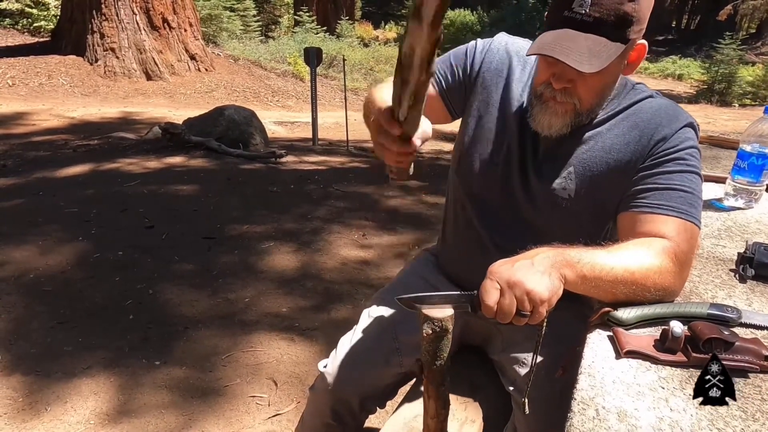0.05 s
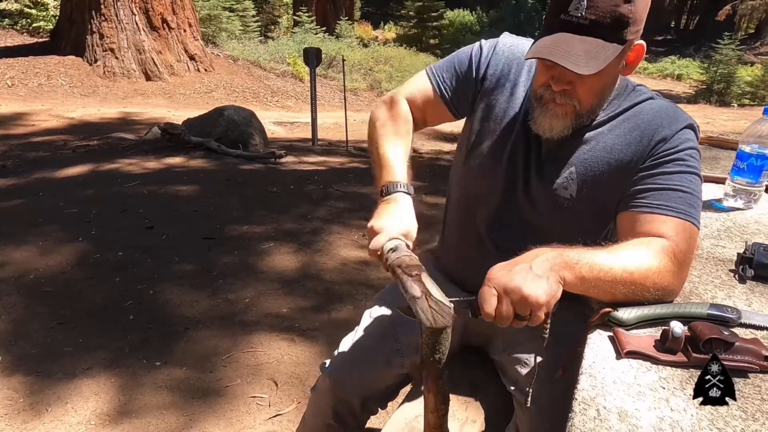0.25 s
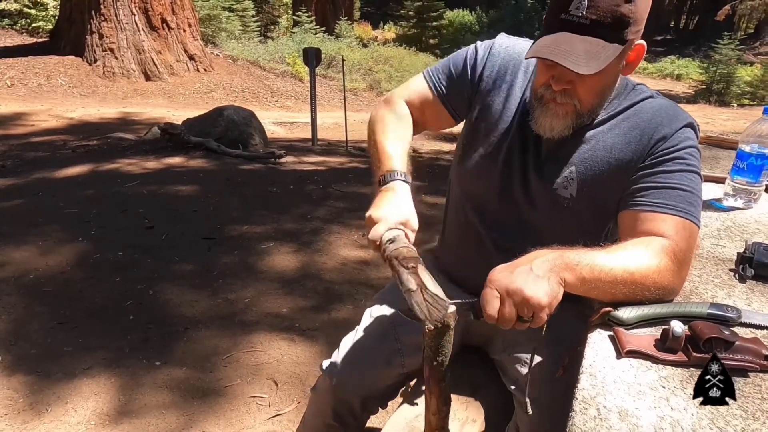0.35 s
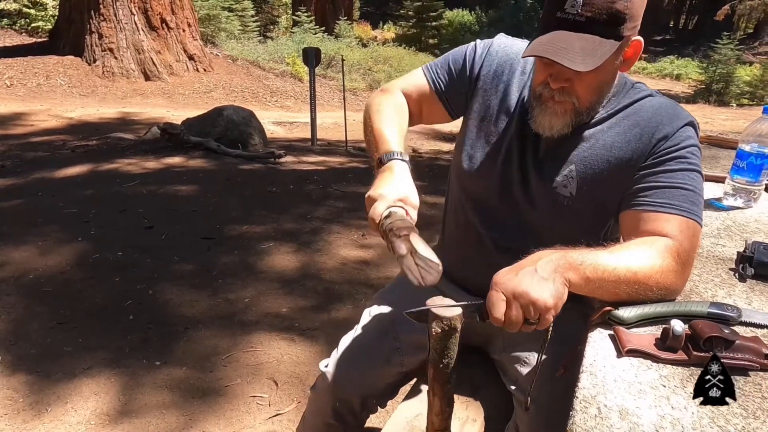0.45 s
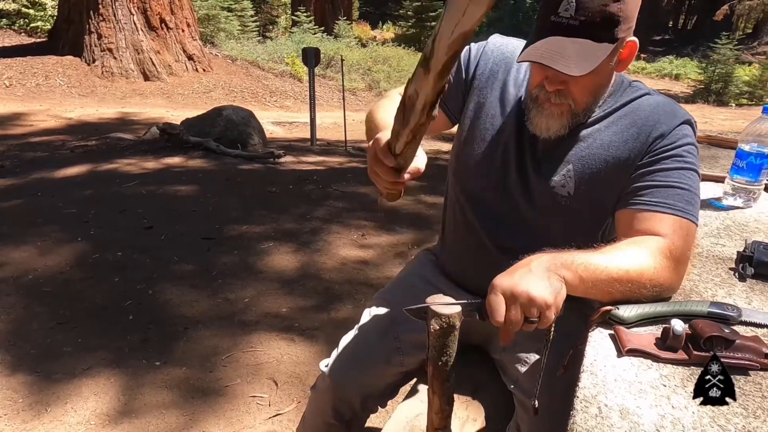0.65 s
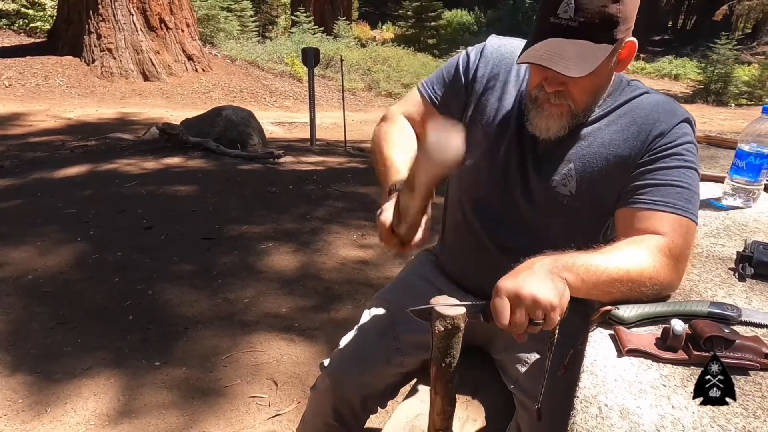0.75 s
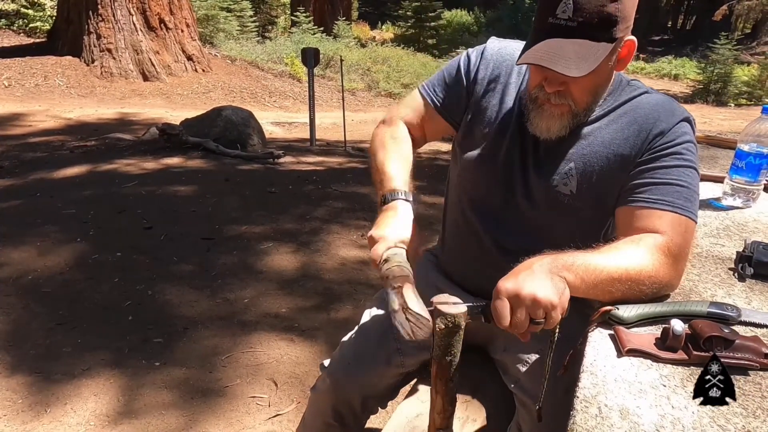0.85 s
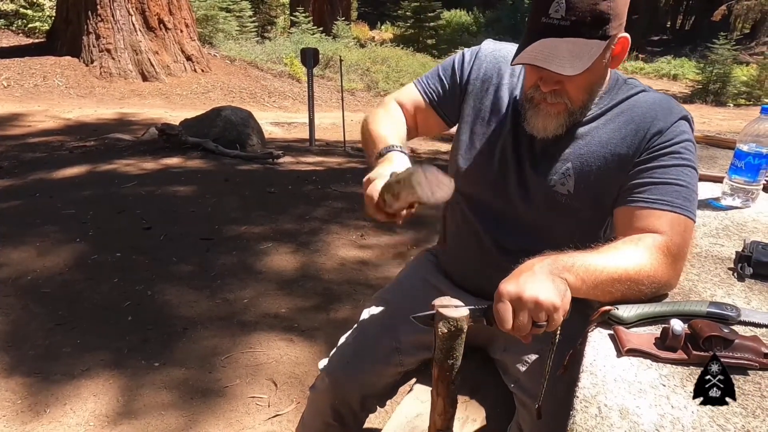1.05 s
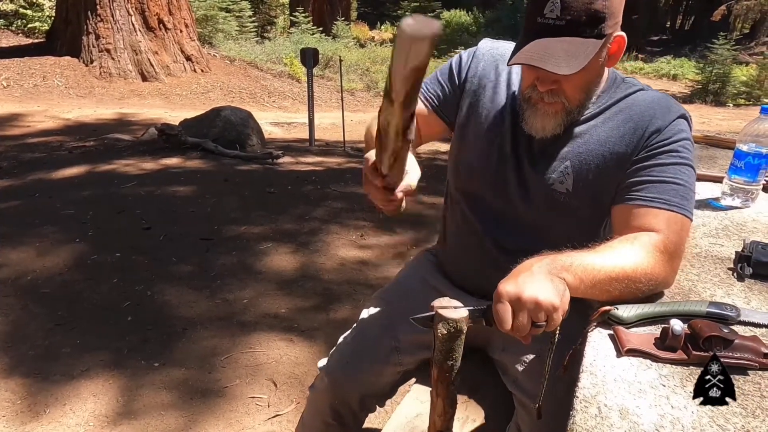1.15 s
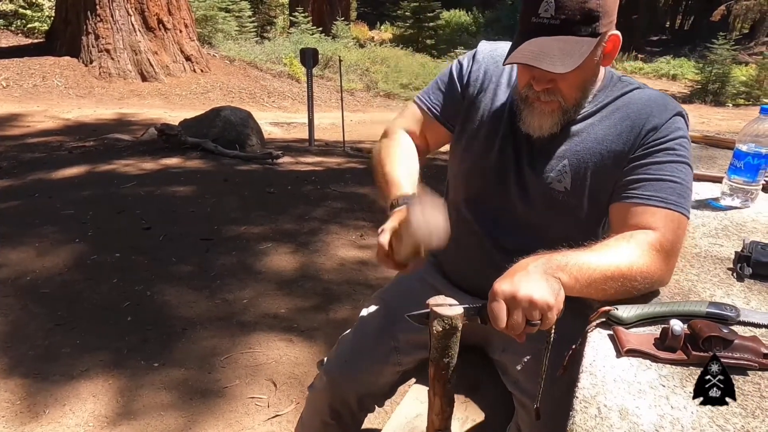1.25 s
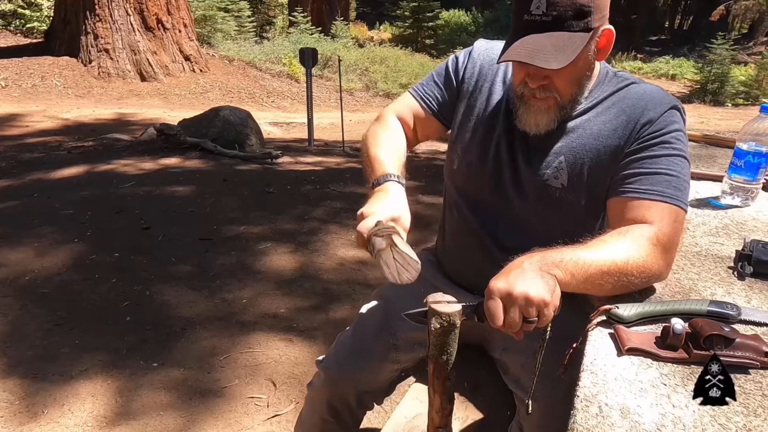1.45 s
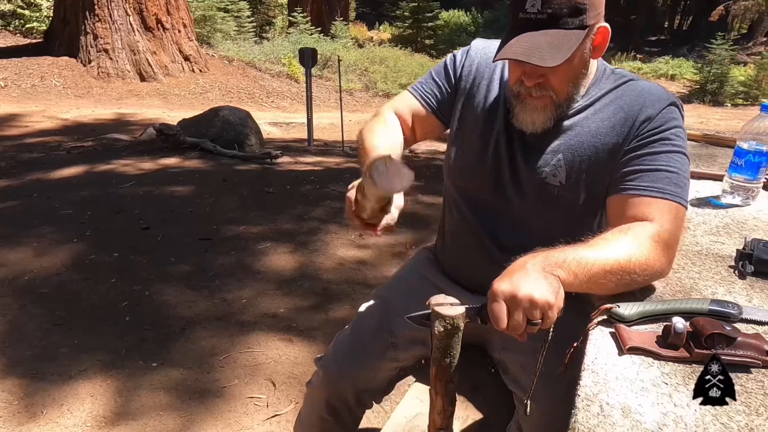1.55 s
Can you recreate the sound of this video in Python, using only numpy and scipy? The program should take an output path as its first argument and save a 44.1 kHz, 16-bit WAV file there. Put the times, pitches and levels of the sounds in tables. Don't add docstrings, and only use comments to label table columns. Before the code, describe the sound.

A wooden baton knocks a knife through a small log, three sharp woody cracks in a forest clearing

```python
import sys
import numpy as np
from scipy import signal
from scipy.fft import rfft, irfft
from scipy.io import wavfile
from scipy.ndimage import uniform_filter1d

SR = 44100
rng = np.random.default_rng(int(sys.argv[2]) if len(sys.argv) > 2 else 0)


def volts(x):
    e = np.asarray(x, float) / 20
    return 10 ** e


def to_wav(s):
    ch = np.atleast_2d(s).T
    pcm = np.round(np.clip(ch, -1, 1) * 32767)
    wavfile.write(sys.argv[1], SR, pcm.astype(np.int16))


N = 70560

# (frequency [Hz], level [dB per Hz])
AIR_SPECTRUM = [(15, -39), (25, -25), (54, -12.5), (90, -16), (180, -6), (383, -8.5), (438, -11.5),
                (543, -8), (879, -19.5), (2000, -20.5), (3260, -30), (5000, -38), (15000, -71)]
# (frequency [Hz], likeness [-1 to 1])
SIDE_LIKENESS = [(60, 0.93), (180, 0.94), (550, 0.82), (1650, 0.36), (4970, 0.74), (15000, 0.96)]
# (frequency [Hz], width [Hz], boost [dB])
DIFFUSE_MODES = [(340, 45, 0.5), (700, 62, 7), (1800, 270, 5), (3230, 120, 6)]
# (time [s], level [dB], half length [s])
SLEEVE_SWELLS = [
    (0.478, -78.5, 0.046),
    (0.988, -77.5, 0.031),
    (1.5, -84, 0.025),
]
# (frequency [Hz], level [dB])
CLOTH_SPECTRUM = [(1500, -20), (4000, 8), (8000, 8.5), (12000, 2), (15000, -22)]
# (frequency [Hz], level [dB], decay t60 [s])
TREE_ECHO = [(98.7, -45, .4), (317.7, -46, 1), (660, -32.5, 0.97), (970, -33.5, 0.98), (2020, -40, 0.92),
             (2600, -41, 0.86), (3300, -44.5, 0.96), (5500, -41, 0.35), (11000, -42, 0.49)]
# (time [s], level [dB], pitch [Hz], decay t60 [s])
SPLINTERS = [(0.3031, -56, 4750, 0.0069), (0.468, -50.5, 4680, 0.022), (0.5995, -61, 4650, 0.0099),
             (0.6931, -55, 4930, 0.0067), (0.728, -60, 8000, 0.0074), (.754, -56, 4490, 0.0088),
             (.9274, -63.5, 8000, 0.0091), (.992, -37, 5470, 0.0051), (1.0344, -65, 5912, .01),
             (1.133, -64, 5000, .008), (1.4157, -58, 6000, .014), (1.464, -64, 7000, 0.018),
             (1.4762, -61.5, 5500, 0.0091), (1.4854, -69, 5030, .01), (1.499, -56.5, 7000, 0.011),
             (1.506, -51, 5860, 0.01), (1.5104, -56, 5500, 0.011), (1.5434, -68, 4860, 0.0098),
             (1.555, -64, 6010, .016), (1.5897, -69, 5070, 0.011)]
# (time [s], crack [dB], log [dB], stump [dB], ground [dB])
CONTACTS_HEARD = [
    (0.2299, 0.5, -7.5, -8.5, -57.5),
    (.262, -44.5, -26, -55.5, -47),
    (0.278, -57.5, -50, -21.5, -45),
    (0.4673, -42, -50, -48, -90.5),
    (0.7938, -2.5, 1.5, -7, -19.5),
    (0.824, -55, -27, -30, -31),
    (0.841, -26, -22, -16, -44.5),
    (1.2832, -4.5, -1.5, -7, -17),
    (1.3218, -26.5, -26.5, -61, -25),
    (1.364, -67, -41.5, -29.5, -60),
]
# (time [s], crack [dB], log [dB], stump [dB], ground [dB])
RETOUCHES = [
    (0.2439, -28, -40.5, -52, -67.5),
    (0.8573, -72.5, -44.5, -22, -61),
    (1.308, -69.5, -33.5, -20, -54),
    (1.38, -70, -64, -38.5, -60),
]
DEEPER_AT = [.5, 1.1]
# (frequency [Hz], level [dB], decay t60 [s], lag [s])
BLADE_MODES = [
    [(1023, -13.5, 0.043, 0.0012), (1455, -1.5, 0.013, 0.000036), (1888, -10.5, 0.036, .001),
     (2438, -3, 0.008, .002), (3104, -1.5, 0.014, .0024), (3292, -4, 0.015, 0.002226),
     (4650, -9, 0.014, .0004), (6350, -11, 0.0066, .0008)],
    [(1023, -12.5, 0.049, 0.0023), (1230.2, 1, 0.0067, 0.000037), (1610, 2.5, 0.0089, .0025),
     (1939, -10.5, 0.033, 0.002066), (2620, -18, 0.0076, 0.00049), (3744, 1, 0.0064, .0012),
     (4540, 2.5, 0.0069, 0.00031), (7000, -15.5, 0.0067, 0.00058)],
    [(1099, -1, 0.0194, 0.003014), (1253, -7, 0.025, 0.001016), (1930, -8.5, 0.034, .0022),
     (2665, -6.5, 0.0085, 0.001473), (3760, -1.5, 0.007, 0.0015), (4490, -4, 0.0098, 0.00079),
     (5940, -30, 0.019, 0.0016), (7260, -25, 0.00475, 0.006)],
]
# (frequency [Hz], level [dB], decay t60 [s])
LOG_MODES = [
    [(327.3, 2, 0.077), (540, -11, 0.059), (656, -15, 0.052), (818, -19.5, 0.086)],
    [(327, -2, 0.032), (617, -3, 0.022), (905, -7.5, 0.026)],
    [(322, 4.5, 0.029), (612, -3, 0.033), (674, -15, .04), (898, -3, 0.0207)],
]
# (pitch [Hz]), (decay t60 [s]), (rise [s]), (long tail [dB])
STUMP_PITCH = [175, 185.5, 173.8]
STUMP_DECAY = [0.088, 0.067, 0.064]
STUMP_RISE = [0.0052, 0.004, .003]
STUMP_TAIL = [-20.5, -30.5, -28]
# (frequency [Hz], level [dB])
GROUND_NEIGHBOURS = [(84, -21.5), (122, -17)]
# (length [s]), (level [dB])
CHATTER_LENGTH = [0.0035, 0.0046, 0.0046]
GRIT_LEVEL = [-29, -30.5, -34]
# (frequency [Hz], level [dB])
SNAP_SPECTRUM = [(300, -25), (1200, -0.5), (3000, 2.5), (5000, -10), (7000, -20.5), (10000, -26.5),
                 (13000, -30.5), (16000, -36)]
LEAD_LEVEL = [-28.5, -19.5, -19]
# (frequency [Hz], left over right [dB], phase [rad])
PORT_DIFFERENCE = [(100, 0, 0), (190, .2, 0), (330, -1.4, -.26), (600, -.5, -.22), (1000, -.8, -.2),
                   (1800, -1.3, -.55), (3500, -1.6, -.65), (5000, -.8, -.5), (9000, .3, -.2)]

AIR_DB = -58.5
NEAR_DB, NEAR_T60, SWELL_S = 13.5, 0.18, 0.15
TRUNK_DB, TRUNK_HZ, TRUNK_S = -59, 514.7, 0.162
EARLIER_S, EARLIER_DB = 0.45, -1
TICK_BODY_HZ, TICK_BODY_DB = 2200, -29
CHATTER_FADE_DB, SNAP_DB, GRIT_T60, BLADE_RISE_S = 3.5, -7, 0.029, 0.0001
SOFT_BELOW_DB, SOFT_HZ = -15, 6000
LOG_LAG_S, LOG_RISE_S, LOG_CREST_S = 0.0032, 0.0015, 0.0053
STUMP_LAG_S, STUMP_TAIL_T60 = 0.0043, 0.37
GROUND_HZ, GROUND_T60, GROUND_RISE_S = 103, 0.23, 0.031
FRAME_S = 512 / 48000
GHOST_DB, GHOST_STEP_DB, GHOST_HZ, GHOST_LOW_DB = -24, -13, 680, -14
LEAD_HZ, LEAD_DB_PER_S, LEAD_S, LEAD_FADE_IN_S = 905, 1249.5, 0.033, 0.01
LEAD_THROB_DB, LEAD_SIDE_HZ, LEAD_SIDE_DB = 3, 748, -11
CEILING, LOW_CUT_HZ, LOW_FLOOR_DB, HIGH_CUT_HZ = 1.2, 87.4, -14.5, 12000


def read(points, hz, column=1):
    p = np.array(points, float)
    return np.interp(np.log(hz + 1), np.log(p[:, 0] + 1), p[:, column])


def evened(x):
    return x / np.sqrt(np.mean(x ** 2) + 1e-20)


def add(mix, s, sound):
    part = mix[round(s * SR):][:len(sound)]
    part += sound[:len(part)]


def ring(hz, db, t60, lag=0, rise=1e-5, crest=None, size=16000):
    t = np.maximum(np.arange(size) / SR - lag, 0)
    turns = hz * t if crest is None else hz * (t + lag - crest) + 1 / 4
    envelope = volts(db - 60 * t / max(t60, .001)) * (1 - np.exp(-t / rise))
    return envelope * np.sin(2 * np.pi * turns)


def causal(points):
    log_gain = np.log(volts(read(points, abs(np.fft.fftfreq(1024, 1 / SR)))))
    click = np.fft.ifft(np.exp(np.conj(signal.hilbert(log_gain)))).real[:512]
    return click / abs(click).max()


def pair(z, hz):
    a, b, c, d = rng.standard_normal((z.shape[1], z.shape[0], 4)).T
    left, other = a + 1j * b, c + 1j * d
    same = np.clip(read(SIDE_LIKENESS, hz), -1, 1)[:, None]
    both = np.array([left, same * left + np.sqrt(1 - same ** 2) * other])
    return signal.istft(both * z, nperseg=2 * len(hz) - 2, noverlap=3 * (len(hz) - 1) // 2)[1]


def air():
    hz, frames = np.fft.rfftfreq(1024, 1 / SR), N // 256 + 5
    patches = uniform_filter1d(rng.standard_normal((frames, 513)), 8, 0)
    patches = evened(uniform_filter1d(patches, 6, 1)).T
    rumble_db = 18.1 * (hz < 60)
    level = (read(AIR_SPECTRUM, hz) + rumble_db)[:, None] + 2.3 * patches
    return volts(AIR_DB) * evened(pair(volts(level), hz)[:, :N])


def sleeve():
    hz, t = np.fft.rfftfreq(256, 1 / SR), np.arange(N // 64 + 5) * 64 / SR
    swell = sum(volts(db) * np.exp(-((t - s) / half) ** 2) for s, db, half in SLEEVE_SWELLS)
    return pair(volts(read(CLOTH_SPECTRUM, hz))[:, None] * swell / 10, hz)[:, :N]


def forest(blows):
    hz, t = np.fft.rfftfreq(256, 1 / SR), np.arange(800) * 64 / SR
    t60 = read(TREE_ECHO, hz, column=2)[:, None]
    late = np.clip(t / SWELL_S, 0, 1) ** 2 * volts(-60 * np.maximum(t - SWELL_S, 0) / t60)
    near = volts(NEAR_DB - 60 * t / NEAR_T60)
    tail = pair(volts(read(TREE_ECHO, hz))[:, None] * (late + near), hz) / 300
    tail = tail + ring(TRUNK_HZ, TRUNK_DB, 0.034, TRUNK_S, 0.0042, size=799 * 64)
    skip = round(EARLIER_S * SR)
    earlier = volts(EARLIER_DB) * blows[round(CONTACTS_HEARD[4][0] * SR):][:skip]
    x = np.concatenate([earlier, blows])
    return signal.fftconvolve(x[None], tail, axes=1)[:, skip:N + skip]


def tick(db, hz, t60):
    fade = volts(-60 * np.arange(600) / SR / max(t60, .001))
    grains = 0.15 * rng.standard_normal(600) ** 3 * fade
    grains[0] = 1
    sliver = ring(hz, 0, .00045, 0, .00003, size=200)
    body = ring(TICK_BODY_HZ, TICK_BODY_DB, 0.0016, 0, .0001, size=200)
    burst = np.convolve(grains, sliver + body)
    return volts(db + 3.0) * burst / abs(burst).max()


def ground_thud(db):
    modes = [(GROUND_HZ, 0)] + list(GROUND_NEIGHBOURS)
    return sum(ring(hz, db + side, GROUND_T60, STUMP_LAG_S, GROUND_RISE_S) for hz, side in modes)


def stump_thud(k, db):
    hz, rise = STUMP_PITCH[k], STUMP_RISE[k]
    thud = ring(hz, db, STUMP_DECAY[k], STUMP_LAG_S, rise)
    return thud + ring(hz, db + STUMP_TAIL[k], STUMP_TAIL_T60, STUMP_LAG_S, rise)


def log_knock(k, db):
    return volts(db) * sum(ring(*mode, LOG_LAG_S, LOG_RISE_S, LOG_CREST_S) for mode in LOG_MODES[k])


def crack(k, db):
    t, chance = np.arange(4000) / SR, rng.standard_normal((4000, 2)).T
    length = CHATTER_LENGTH[k]
    shape = volts(CHATTER_FADE_DB * t / length) / (1 + (t / length) ** 8)
    chatter = .5 * shape * chance[0] * (abs(chance[1]) > 1.3)
    chatter[0] = 1
    grit = volts(GRIT_LEVEL[k] - 60 * t / GRIT_T60) * chance[1]
    steel = sum(ring(*mode, BLADE_RISE_S) for mode in BLADE_MODES[k])
    out = steel + signal.fftconvolve(steel, grit)[:len(steel)]
    add(out, 0, volts(SNAP_DB) * signal.fftconvolve(causal(SNAP_SPECTRUM), chatter + grit))
    if db < SOFT_BELOW_DB:
        out = signal.lfilter(*signal.butter(1, SOFT_HZ, fs=SR), out)
    return volts(db) * out / abs(out).max()


def contact(s, crack_db, log_db, stump_db, ground_db):
    k = np.searchsorted(DEEPER_AT, s)
    return crack(k, crack_db) + log_knock(k, log_db) - stump_thud(k, stump_db) + ground_thud(ground_db)


def tone_lead(s, log_db):
    t = np.arange(-LEAD_S, .004, 1 / SR)
    slope = LEAD_DB_PER_S * abs(t) * (1 + 4 * (t > 0))
    throb = LEAD_THROB_DB * np.cos(2 * np.pi * (t - .004) / FRAME_S)
    level = log_db + LEAD_LEVEL[np.searchsorted(DEEPER_AT, s)] - slope + throb
    fade_in = np.minimum((t + LEAD_S) / LEAD_FADE_IN_S, 1)
    tone = np.cos(2 * np.pi * LEAD_HZ * (t - LOG_CREST_S))
    side = volts(LEAD_SIDE_DB) * np.sin(2 * np.pi * LEAD_SIDE_HZ * t)
    return volts(level) * fade_in * (tone + side)


def leaks(blows):
    hz = np.fft.rfftfreq(N, 1 / SR)
    ghosts = sum(volts(GHOST_DB + k * GHOST_STEP_DB) * np.exp(2j * np.pi * hz * (k + 1) * FRAME_S)
                 for k in range(4))
    colour = volts(GHOST_LOW_DB) + 1 / (1 + (GHOST_HZ / (hz + 1)) ** 4)
    out = irfft(rfft(blows) * ghosts * colour, N)
    for s, _, log_db, *_ in CONTACTS_HEARD:
        add(out, s - LEAD_S, tone_lead(s, log_db))
    return out


def scene():
    blows, ticks = np.zeros(N), np.zeros(N)
    for row in CONTACTS_HEARD:
        add(blows, row[0], contact(*row))
    for s, *row in SPLINTERS:
        add(ticks, s, tick(*row))
    for row in RETOUCHES:
        add(ticks, row[0], contact(*row))
    hz = np.fft.rfftfreq(N, 1 / SR)
    resonances = volts(sum(db / (1 + (2 * (hz - f) / width) ** 2) for f, width, db in DIFFUSE_MODES))
    diffuse = irfft(rfft(forest(blows) + air()) * resonances, N) + sleeve()
    port = volts(read(PORT_DIFFERENCE, hz) / 2) * np.exp(.5j * read(PORT_DIFFERENCE, hz, column=2))
    direct = rfft(blows + ticks + leaks(blows))
    return irfft(direct * np.array([port, 1 / port]), N) + diffuse


def top_cut(x):
    return signal.sosfilt(signal.butter(12, 16440, fs=SR, output="sos"), x)


def record(dry):
    hz = np.fft.rfftfreq(2 * N, 1 / SR)
    low = np.maximum(1 / np.sqrt(1 + (LOW_CUT_HZ / (hz + 1)) ** 6), volts(LOW_FLOOR_DB))
    band = low / np.sqrt(1 + (hz / HIGH_CUT_HZ) ** 10)
    x = CEILING * np.tanh(np.hstack([dry, dry[:, ::-1]]) / CEILING)
    return top_cut(irfft(rfft(x) * band, 2 * N)[:, :N])


dry = scene()
out = record(dry)
to_wav(out)
```